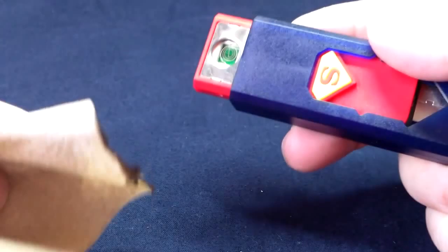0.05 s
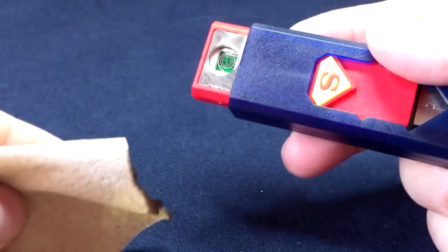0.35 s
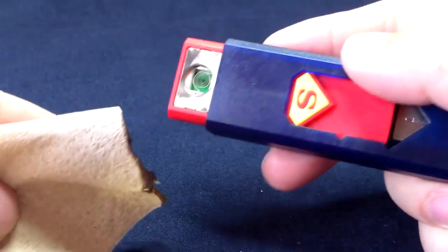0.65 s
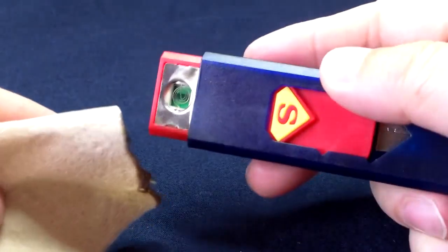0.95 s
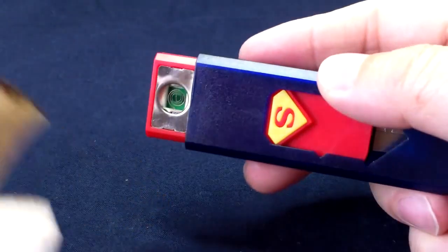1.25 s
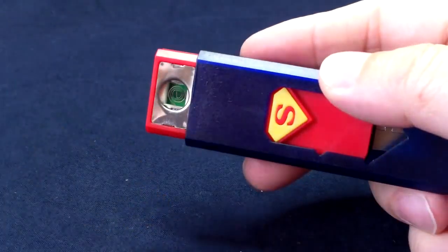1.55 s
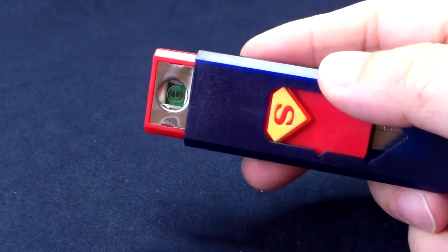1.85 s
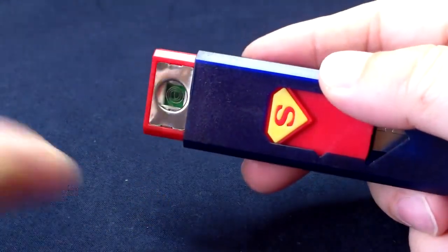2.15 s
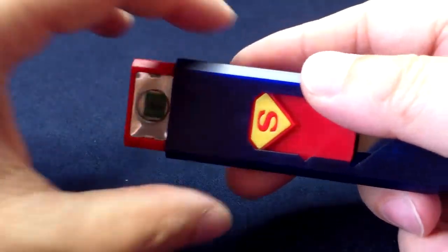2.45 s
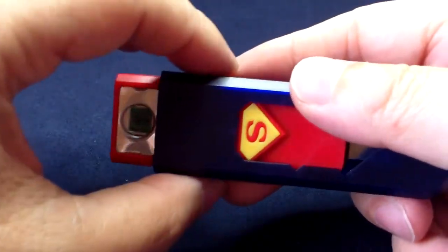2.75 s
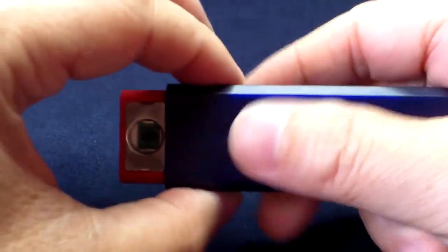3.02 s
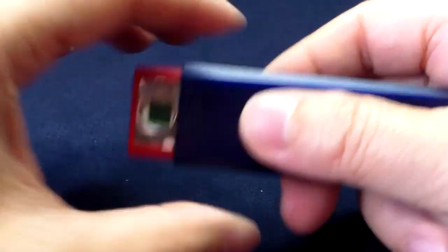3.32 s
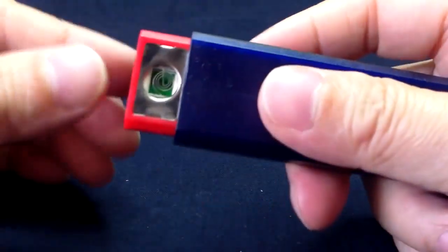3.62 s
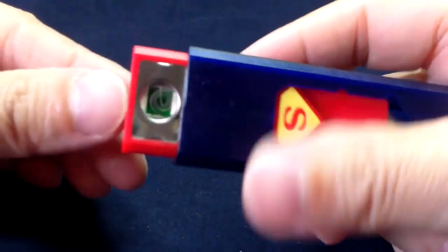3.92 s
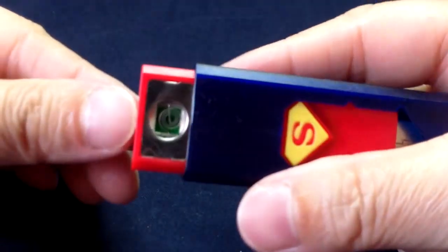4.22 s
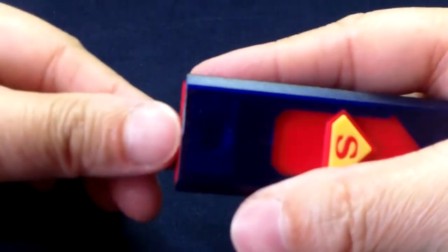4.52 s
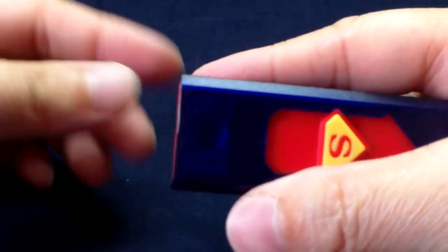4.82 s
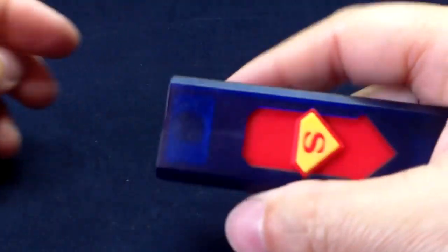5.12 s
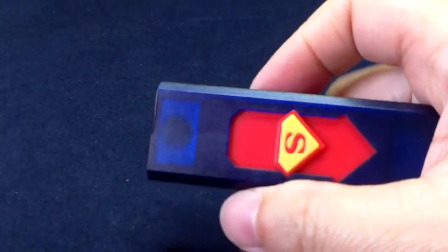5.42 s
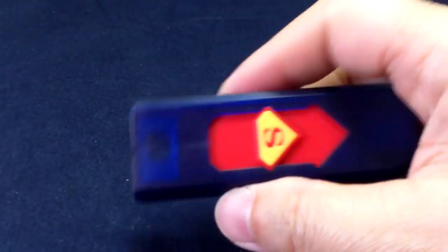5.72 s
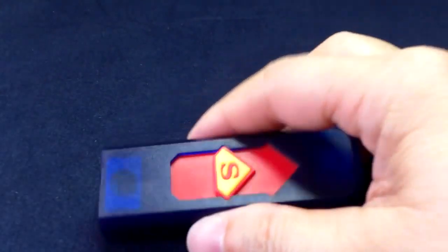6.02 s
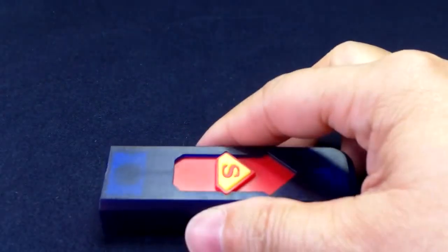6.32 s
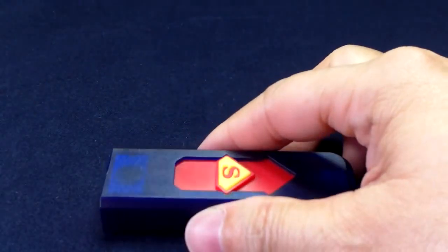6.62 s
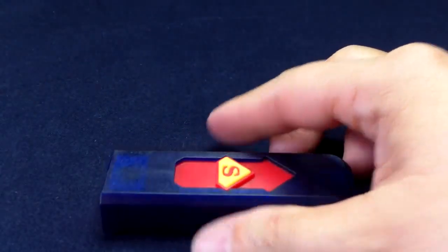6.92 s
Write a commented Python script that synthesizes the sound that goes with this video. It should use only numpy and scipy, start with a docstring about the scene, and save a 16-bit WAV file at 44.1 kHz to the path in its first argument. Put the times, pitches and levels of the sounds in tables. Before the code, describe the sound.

In a small, quiet room a fan hums and a distant clock ticks faintly. Right by the microphone, paper rustles and crackles as it is drawn over cloth and set down. After some light handling, a lighter's slider scrapes and clicks against its latch, then shoots back with a hard snap that overloads the microphone and briefly dips the background. Soft rubbing of skin on the case follows.

```python
"""A slide lighter, close to the microphone in a small room: its slider scrapes, clicks against the latch,
then springs home with a snap that overloads the input and makes the gain control duck the room for half
a second. Before that, just as near, a scrap of paper is drawn away over a cloth and put down, and
fingers turn the lighter's case. Behind it all a fan hums and a distant clock ticks faintly."""
import sys
import numpy as np
from scipy import signal
from scipy.fft import rfft, irfft
from scipy.io import wavfile
from scipy.ndimage import minimum_filter1d

SR = 44100
rng = np.random.default_rng(int(sys.argv[2]) if len(sys.argv) > 2 else 0)


def store_pcm(level_fs):
    """Save levels as 16-bit WAV."""
    pcm = np.round(np.clip(level_fs, -1, 1) * 32767).astype(np.int16)
    wavfile.write(sys.argv[1], SR, np.atleast_2d(pcm).T)


N = 306936
TIME = np.arange(N) / SR

# Levels in the tables are relative; each source has its own gain.
# slider clicks: t/s, level/dB, position (0 out, 1 home), first bounce gap/s, loss per bounce/dB
SLIDER_CLICKS = [(4.1272, -18.5, 0, 0.00031, 3), (4.1294, -3.5, 0, .0009, 3), (4.3372, -21.5, 0, .0017, 1),
                 (4.4963, -25, 0, .001, 12), (4.6178, 21, 1, 0.0012, 2.8), (4.741, -36, 1, .001, 20),
                 (4.761, -30, 0, .001, 20), (4.8135, -29, 0, .001, 20)]
# modes of the lighter's shell, slider out and slider home: f/Hz, level/dB, t60/s
SHELL_OUT_MODES = [(2016, -18.5, .03), (2348, -19.5, 0.015), (2670, -19.5, .016), (3240, -21, 0.017),
                   (3570, -17, 0.017), (4000, -13.5, 0.011), (4750, -5, 0.0059), (5400, -4, 0.0052),
                   (6960, -20, .007), (8150, -6, .005), (8800, -12, 0.0049)]
SHELL_HOME_MODES = [(1000, -10.5, 0.017), (1380, -13.5, .016), (1610, -14, .02), (1786, -9.5, 0.024),
                    (2650, -11, .012), (3010, -13, 0.02), (4120, -21, .01), (4554, -9, 0.014),
                    (5490, -10, 0.015), (5760, -16.5, .01), (7860, -5.5, 0.011), (8530, -4.5, .006),
                    (8900, -13.5, .008)]
# the dry crack of a contact: f/Hz, level/dB
CRACK_TONE = [(60, -11.5), (300, -14), (750, -20), (1300, -12), (2000, -5.5), (4000, -2.5), (5400, -0.5),
              (6600, -7), (8500, 3), (10200, -7.5), (12000, -14.5), (15500, -13.5)]
# the slider scraping in its track, pushed and running back: t/s, level/dB
PUSH_LEVELS = [(4.0, -58.5), (4.045, -56), (4.07, -42.5), (4.10, -35.5), (4.125, -47), (4.135, -58.5)]
RETURN_LEVELS = [(4.494, -54), (4.52, -41.5), (4.555, -42), (4.585, -48.5), (4.617, -45)]
# spectra of those two scrapes: f/Hz, level/dB
SLIDER_PUSH_TONE = [(710, -50), (1200, -22), (1600, -22), (2090, -9), (2860, -25.5), (3210, -12.5),
                    (3850, -25), (4200, -17), (5370, 1), (7090, -12.5), (9680, -4.5), (11400, -18),
                    (15500, -20)]
SLIDER_RETURN_TONE = [(590, -46), (1000, -14), (1530, -16), (1790, 0.5), (2450, -6.5), (2940, -14.5),
                      (3960, -4), (4760, -11), (5460, -5.5), (7110, -16), (8540, -3.5), (12600, -23),
                      (15500, -23)]
# low thumps as the paper is put down, the slider snaps home and the case is bumped:
# t/s, level/dB, f/Hz, t60/s
LOW_THUMPS = [(2.0109, -20, 117, 0.033), (2.0112, -35.5, 637, 0.026), (2.0185, -23, 107, 0.046),
              (4.6197, 6, 174.6, .025), (4.6194, -3, 279, 0.017), (4.74, -15, 200, 0.008)]
# strokes of the paper: peak t/s, level/dB, rise/s, fall/s, motion (0 scraping on cloth, 1 drawn away)
PAPER_STROKES = [(0.165, -38, 0.41, 0.22, 0), (0.281, -37.5, 0.053, 0.042, 0), (0.497, -46, .15, 0.15, 0),
                 (0.7, -58, 0.24, 0.25, 0), (1.08, -52.5, 0.15, 0.11, 1), (1.22, -47, 0.099, .15, 1),
                 (1.37, -40, 0.4, 0.47, 1), (1.59, -41, 0.17, 0.37, 1), (1.947, -40, 0.019, 0.048, 1),
                 (2.02, -37.5, 0.042, 0.06, 1), (2.075, -45.5, .03, 0.074, 1)]
# spectra of the paper, scraping on the cloth and drawn away: f/Hz, level/dB
PAPER_SCRAPE_TONE = [(300, -23), (1100, -16.5), (1600, -9), (2100, -5), (2500, -15.5), (4300, -8.5),
                     (5000, -7), (5700, -2.5), (6700, -9.5), (8500, 0), (10000, -7.5), (11500, -12.5),
                     (15500, -20)]
PAPER_DRAG_TONE = [(300, -21), (900, -11), (1400, -10.5), (1750, -9), (2100, -7), (4300, -6.5), (5000, -3),
                   (5700, 0), (6700, -6), (8500, 3.5), (10000, -4), (11500, -10.5), (15500, -16.5)]
# the clearest crackles of the paper: t/s, level/dB, lift of the lower band/dB
PAPER_CRACKLES = [(0.278, -21, 11), (0.295, -22, 4), (0.5332, -22, 8), (0.5636, -28, -6), (0.597, -30, -6),
                  (0.8252, -34, -9), (1.2304, -15, -11.5), (1.315, -27, -16), (1.4454, -24, 18),
                  (1.6382, -28, 3), (1.72, -32, 1), (2.0015, -21, 6)]
# strokes of skin on the case: peak t/s, level/dB, rise/s, fall/s
FINGER_STROKES = [(2.66, -60, .6, 0.32), (3.115, -56, .08, 0.17), (3.26, -60, .04, .07),
                  (3.4, -60, .08, .15), (3.71, -55, 0.14, .35), (4.01, -56.5, 0.12, 0.087),
                  (5.23, -48.5, .3, 0.51), (5.71, -48, 0.058, 0.096), (5.83, -53.5, .04, .22),
                  (5.99, -57.5, .16, .16), (6.24, -57.5, 0.19, 0.33)]
# spectrum of skin on the case: f/Hz, level/dB
FINGER_TONE = [(800, -19.5), (2000, -12.5), (4500, -12), (5700, -2), (6700, -10.5), (8500, 2.5),
               (10000, -6.5), (12000, -13.5), (15500, -18)]
# early echoes from table and hands: delay t/s, level/dB
NEAR_ECHOES = [(.0031, -19), (.0085, -27), (.0098, -22), (0.0115, -21.5)]
# decay of the small room: f/Hz, t60/s
ROOM_DECAY = [(150, 0.24), (600, 0.24), (1500, 0.15), (3000, 0.27), (6000, 0.21), (10000, 0.23),
              (15000, 0.3)]
# spectrum of the distant tick: f/Hz, level/dB
CLOCK_TONE = [(600, -27), (1150, -6.5), (1480, 3.5), (1900, -5.5), (3000, -16), (5600, -5.5),
              (9000, -15), (14000, -30)]
# partials of the fan's hum: f/Hz, level/dB
FAN_PARTIALS = [(48.4, -52.5), (97, -63), (145.3, -58), (199.2, -64.5), (545, -69)]
# spectrum of the room's steady air: f/Hz, level/dB
AIR_TONE = [(10, -7.5), (25, -0.5), (42, 1), (70, -12.5), (115, -12), (170, -18), (230, -13.5), (320, -19),
            (450, -23.5), (700, -22), (1000, -29.5), (2500, -37), (8500, -41.5), (15500, -46.5)]
# spectrum of the preamplifier's hiss: f/Hz, level/dB
HISS_TONE = [(100, 8.0), (1500, 5.5), (5000, -1.5), (16000, 0.0)]


def slider_clicks(out_crack_db=-6, home_crack_db=-3, out_ring_db=-4, home_ring_db=-3):
    """Each click rings the shell and its bounces crack; the latch is thin, the home stop chatters on."""
    out = np.zeros(N)
    out_ring = amp(out_ring_db) * shell_ring(SHELL_OUT_MODES)
    home_ring = amp(home_ring_db) * shell_ring(SHELL_HOME_MODES)
    thin_tone = [(hz, db - 7 * (hz < 2300)) for hz, db in CRACK_TONE]
    for start, strength_db, home, gap_s, loss_db in SLIDER_CLICKS:
        add(out, start, amp(strength_db) * (home_ring if home else out_ring))
        for s, db in bounces(start, strength_db, gap_s, loss_db):
            if home:
                add(out, s, amp(db + home_crack_db) * contact(CRACK_TONE, chatter=.3, t60=.012))
            else:
                add(out, s, amp(db + out_crack_db) * contact(thin_tone, chatter=.31, t60=.0036))
    return out


def shell_ring(modes):
    """The struck shell rings in damped modes of alternating sign."""
    t = TIME[:SR // 8]
    return sum((-1) ** k * amp(db - 60 * t / t60) * np.sin(2 * np.pi * hz * t)
               for k, (hz, db, t60) in enumerate(modes))


def bounces(s, db, gap_s, loss_db, count=4, shrink=.9):
    """The contacts (t/s, level/dB) of one click, each weaker and sooner than the last."""
    for k in range(count):
        yield s, db - k * loss_db
        s += gap_s * shrink ** k


def slider_scrape(gain_db=-1):
    """The slider rubs along its track, pushed out and then springing back."""
    push = friction(SLIDER_PUSH_TONE, slips_per_s=2500, spread_db=4.5, smooth=1, flutter_db=1.9)
    back = friction(SLIDER_RETURN_TONE, slips_per_s=3200, spread_db=3, smooth=.93, flutter_db=2)
    return amp(gain_db) * (envelope(PUSH_LEVELS) * push + envelope(RETURN_LEVELS) * back)


def low_thumps():
    """Low, damped modes: the body of the snap, the paper put down and a bump on the case."""
    out, t = np.zeros(N), TIME[:SR // 5]
    for s, db, hz, t60 in LOW_THUMPS:
        add(out, s, amp(db - 60 * t / t60) * np.sin(2 * np.pi * hz * t))
    return out


def paper_crackles(gain_db=-3.5, body_hz=3500, held_s=1.9, faint_per_s=4, delay_s=.00102):
    """Single fibres and ridges let go; faint ones fall by chance while the paper is held."""
    out = np.zeros(N)
    faint_times = TIME[(rng.random(N) < faint_per_s / SR) & (TIME < held_s)]
    faint = [(s, -35 - rng.standard_normal(), 1) for s in faint_times]
    for s, db, body_db in list(PAPER_CRACKLES) + faint:
        tone = [(hz, tone_db + body_db * (hz < body_hz)) for hz, tone_db in PAPER_DRAG_TONE]
        add(out, s + delay_s, amp(db + gain_db) * contact(tone, chatter=.18, t60=.013))
    return out


def paper_rubbing():
    """Paper scrapes on the cloth near the microphone, then is drawn away."""
    scrape_gain = strokes(row for *row, drawn in PAPER_STROKES if not drawn)
    drag_gain = strokes(row for *row, drawn in PAPER_STROKES if drawn)
    scrape = friction(PAPER_SCRAPE_TONE, slips_per_s=1300, spread_db=4, smooth=1.2, flutter_db=1)
    drag = friction(PAPER_DRAG_TONE, slips_per_s=1800, spread_db=4.5, smooth=1.43, flutter_db=1.5)
    return scrape_gain * scrape + drag_gain * drag


def fingers(gain_db=-1):
    """Skin slips over the case as the lighter is turned."""
    skin = friction(FINGER_TONE, slips_per_s=2200, spread_db=3.5, smooth=1.14, flutter_db=1)
    return amp(gain_db) * strokes(FINGER_STROKES) * skin


def contact(tone, chatter, t60, size=1024):
    """A blow followed by a brief chatter of the touching surfaces."""
    force = chatter * rng.standard_normal(size) * amp(-60 * TIME[:size] / t60)
    force[0] = 1
    return signal.fftconvolve(force, impulse(tone))


def friction(tone, slips_per_s, spread_db, smooth, flutter_db):
    """Many tiny slips of uneven size over a smooth hiss, under a wavering pressure."""
    sizes = amp(spread_db * np.minimum(rng.exponential(1, N), 4)) * rng.choice([-1, 1], N)
    slips = unit(sizes * (rng.random(N) < slips_per_s / SR))
    rub = tint(slips + smooth * rng.standard_normal(N), tone)
    return unit(rub * amp(flutter_db * drift(rate_hz=55)))


def strokes(rows, range_db=20, roundness=1.15):
    """Each stroke swells by range_db over its rise and eases as much over its fall; powers add."""
    power = np.zeros(N)
    for s, db, rise_s, fall_s in rows:
        from_peak = np.maximum((s - TIME) / rise_s, (TIME - s) / fall_s)
        power += amp(db - range_db * np.minimum(from_peak, 6) ** roundness) ** 2
    return np.sqrt(power)


def room(x, wet_db=-21, build_s=.008):
    """Mostly direct sound at this distance: a few near echoes, then a short tail dying band by band."""
    hz, t, bands = signal.stft(rng.standard_normal(SR // 2), SR, nperseg=256)
    fading = amp(-60 * t / at_hz(ROOM_DECAY, hz)[:, None])
    tail = signal.istft(bands * fading, SR, nperseg=256)[1]
    tail *= np.minimum(TIME[:len(tail)] / build_s, 1)
    response = amp(wet_db) * tail / np.linalg.norm(tail)
    for s, db in NEAR_ECHOES:
        response[round(s * SR)] += amp(db)
    return x + signal.fftconvolve(x, response)[:N]


def clock(start_s=.683, gain_db=-56, rise_s=.026):
    """One distant tick a second, blurred by the room."""
    age = (TIME - start_s) % 1 / rise_s
    return amp(gain_db) * age * np.exp(1 - age) * tint(rng.standard_normal(N), CLOCK_TONE)


def fan(waver_rad=.7):
    """A fan hums in the background, each partial wavering in phase."""
    return sum(np.sqrt(2) * amp(db) * np.sin(2 * np.pi * hz * TIME + waver_rad * drift(rate_hz=5.8))
               for hz, db in FAN_PARTIALS)


def room_air(gain_db=-46):
    """Room tone: the low, steady noise of the air."""
    return amp(gain_db) * tint(rng.standard_normal(N), AIR_TONE)


def gain_control(x, threshold_db=-19, most_db=17, hold_s=.42, recovery_db_per_s=110, attack_s=.0012):
    """A loud peak at the microphone pulls the gain down; it is held, then comes back."""
    level_db = 10 * np.log10(lag(x ** 2, seconds=.0022) + 1e-12)
    over_db = np.clip(level_db - threshold_db, 0, most_db)
    half_hold = int(hold_s * SR) // 2
    held_db = -minimum_filter1d(-over_db, 2 * half_hold + 1, origin=half_hold, mode="constant")
    ramp_db = TIME * recovery_db_per_s
    duck_db = np.maximum.accumulate(held_db + ramp_db) - ramp_db
    return x * amp(-lag(duck_db, attack_s))


def overload(x, ceiling=.58, shift=.42, coupling_s=.064):
    """Peaks are clipped; the excess shifts the bias, which drains through three coupling capacitors."""
    excess = np.cumsum(np.maximum(abs(x) - 1, 0))
    bias = -shift * lag(np.tanh(excess / 20), seconds=.0016)
    for _ in range(3):
        bias -= lag(bias, coupling_s)
    return ceiling * np.tanh((x + bias) / ceiling)


def amp(db):
    return 10 ** (np.asarray(db) / 20)


def unit(x):
    return x / np.sqrt(np.mean(x ** 2) + 1e-20)


def at_hz(points, hz):
    """Rows (f/Hz, value) read on a log-frequency axis."""
    f, value = np.transpose(points)
    return np.interp(np.log(hz + 1), np.log(f + 1), value)


def envelope(rows, fade_s=.003):
    """Gain over time from rows (t/s, level/dB), fading away outside them."""
    s, db = np.transpose(rows)
    outside_s = abs(TIME - np.clip(TIME, s[0], s[-1]))
    return amp(np.interp(TIME, s, db)) * np.exp(-outside_s / fade_s)


def add(mix, s, sound):
    part = mix[max(round(s * SR), 0):][:len(sound)]
    part += sound[:len(part)]


def tint(x, tone):
    """Gives a steady signal a spectrum, at rms 1."""
    return unit(irfft(rfft(x) * amp(at_hz(tone, np.fft.rfftfreq(N, 1 / SR))), N))


def drift(rate_hz):
    """A slow random wander at rms 1."""
    lowpass = np.exp(-(np.fft.rfftfreq(N, 1 / SR) / rate_hz) ** 2)
    return unit(irfft(rfft(rng.standard_normal(N)) * lowpass, N))


def impulse(tone, size=2048):
    """The sharpest causal click with a given spectrum, peak 1."""
    log_gain = np.log(amp(at_hz(tone, abs(np.fft.fftfreq(size, 1 / SR)))))
    minimum_phase = np.exp(np.conj(signal.hilbert(log_gain)))
    click = np.fft.ifft(minimum_phase).real[:size // 2]
    return click / abs(click).max()


def lag(x, seconds):
    """One-pole smoothing."""
    pole = np.exp(-1 / (seconds * SR))
    return signal.lfilter([1 - pole], [1, -pole], x)


def scene():
    """Lighter and paper close to one microphone; clock, fan and air behind them."""
    near = slider_clicks() + paper_crackles() + low_thumps()
    near += paper_rubbing() + fingers() + slider_scrape()
    return (room(near) + clock() + fan() + room_air())[None]


def record(dry, hiss_db=-66.5, edge_hz=15950):
    """The microphone's chain: gain control, overload, preamplifier hiss and the band limit."""
    clipped = overload(gain_control(dry[0]))
    hiss = amp(hiss_db) * tint(rng.standard_normal(N), HISS_TONE)
    lowpass = signal.firwin(301, edge_hz, window=("kaiser", 8), fs=SR)
    return signal.oaconvolve(clipped + hiss, lowpass, "same")[None]


dry = scene()
out = record(dry)
store_pcm(out)
```